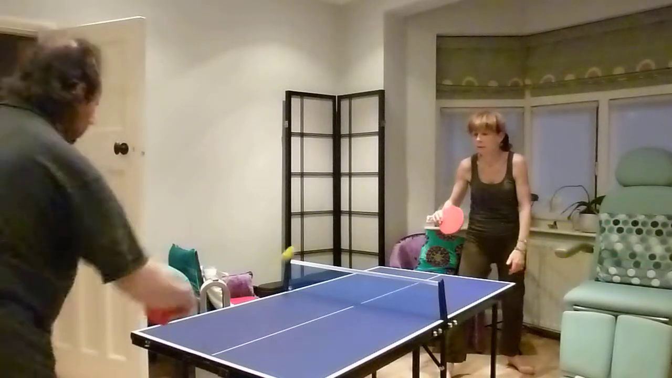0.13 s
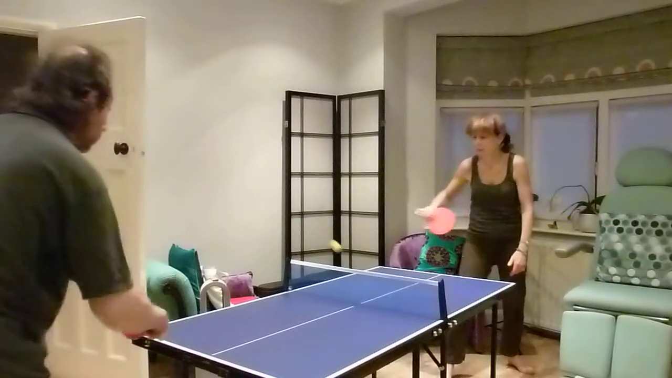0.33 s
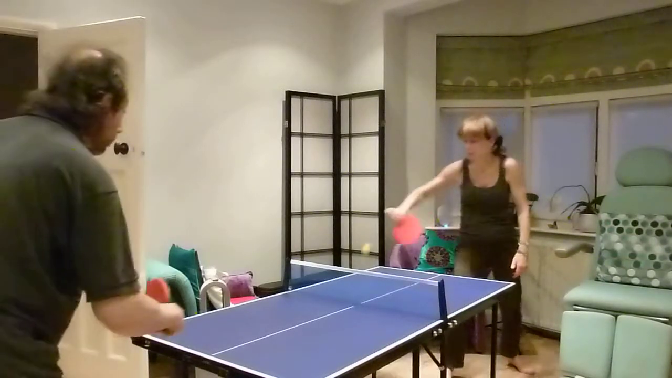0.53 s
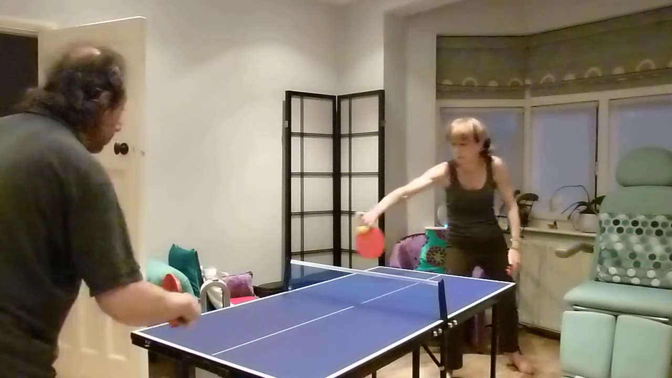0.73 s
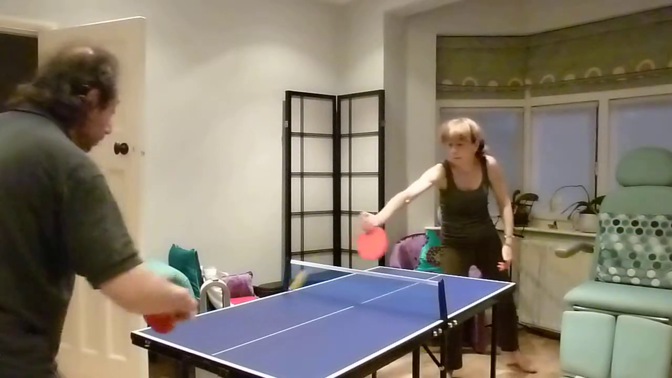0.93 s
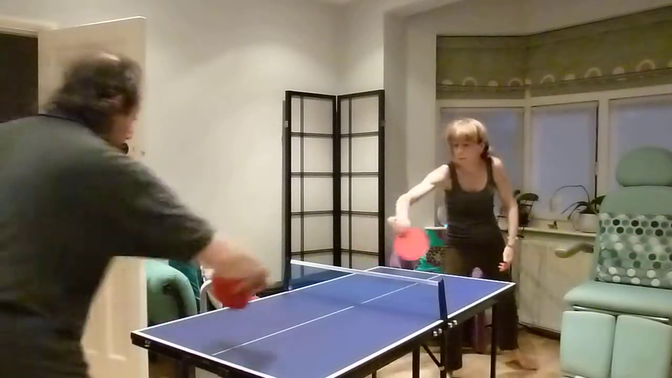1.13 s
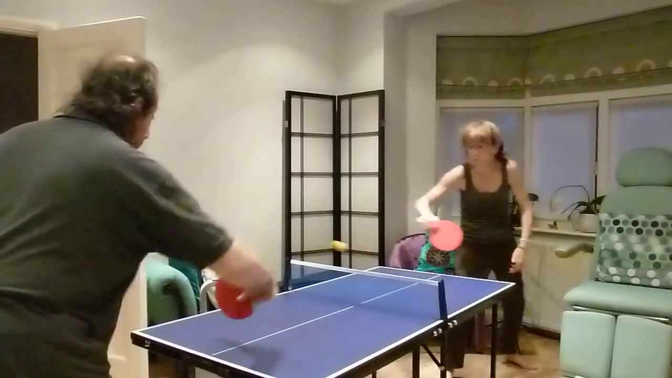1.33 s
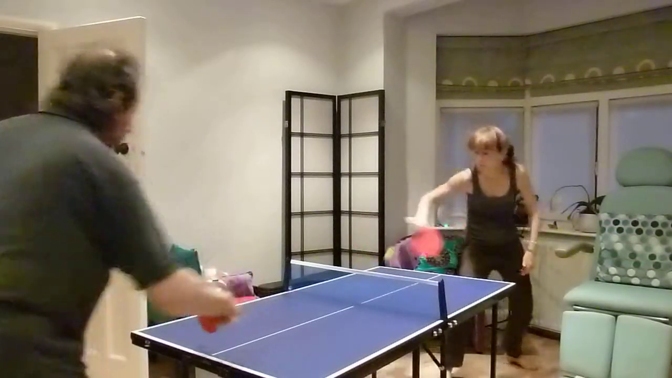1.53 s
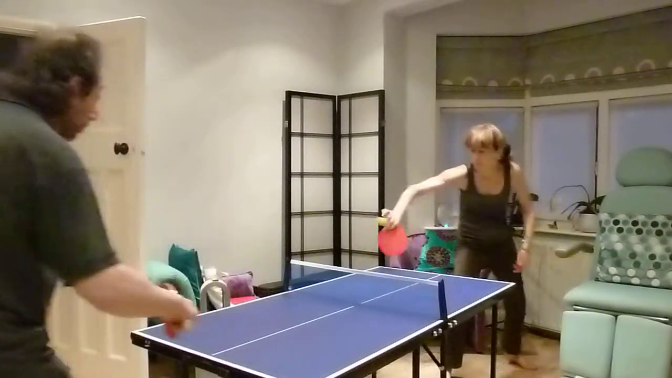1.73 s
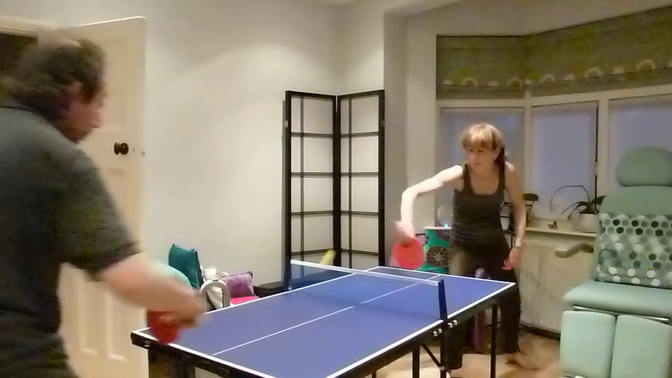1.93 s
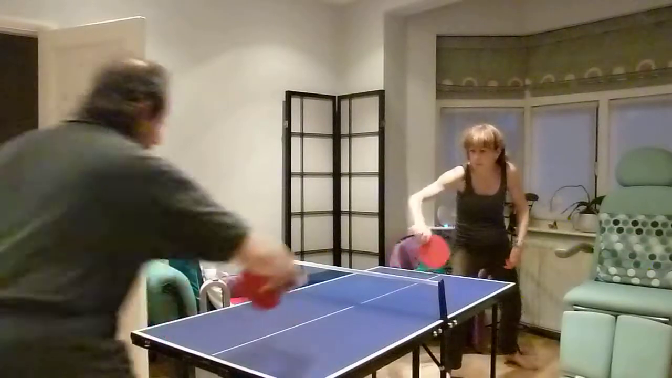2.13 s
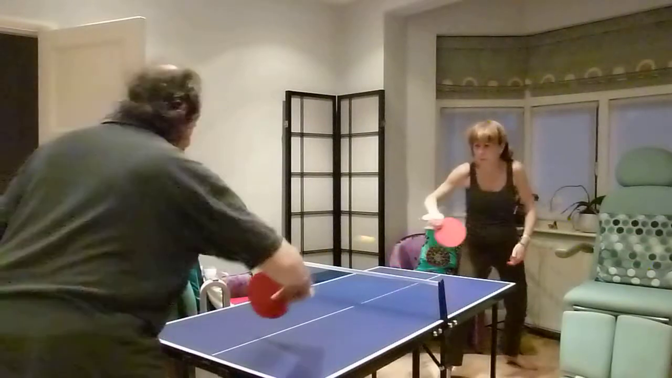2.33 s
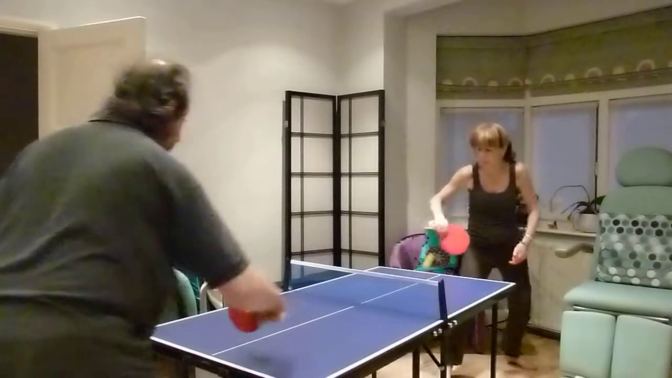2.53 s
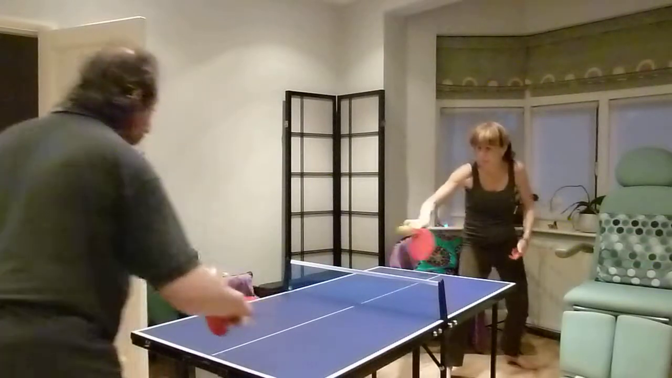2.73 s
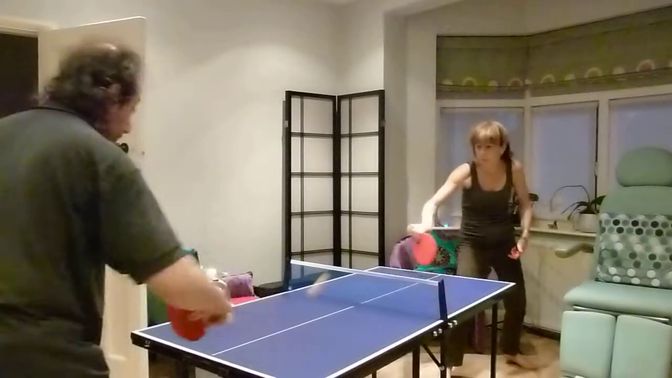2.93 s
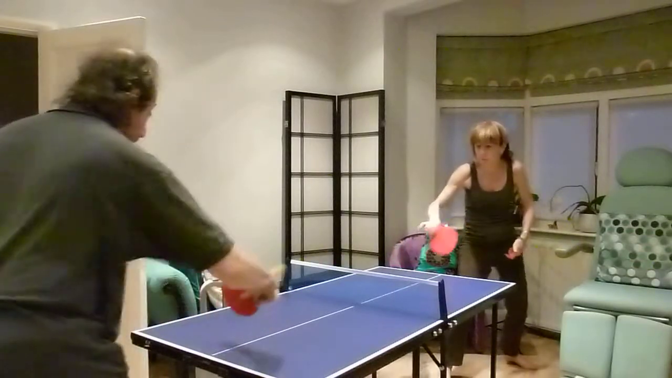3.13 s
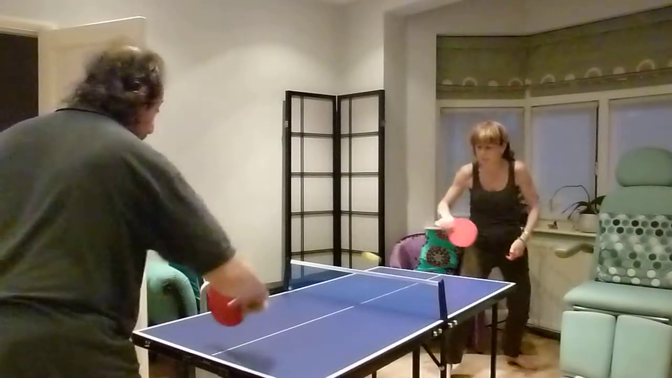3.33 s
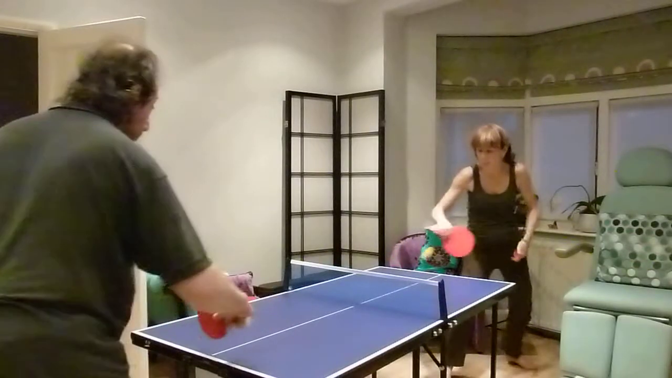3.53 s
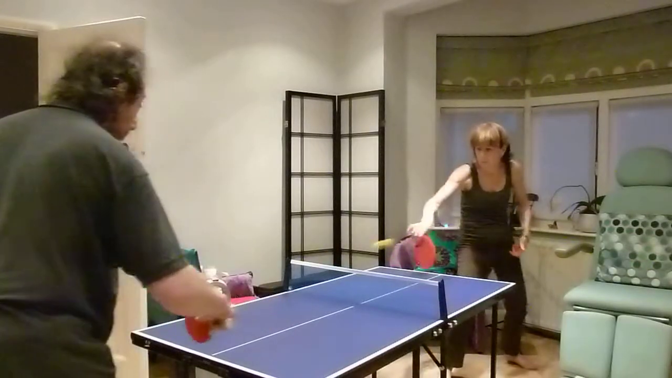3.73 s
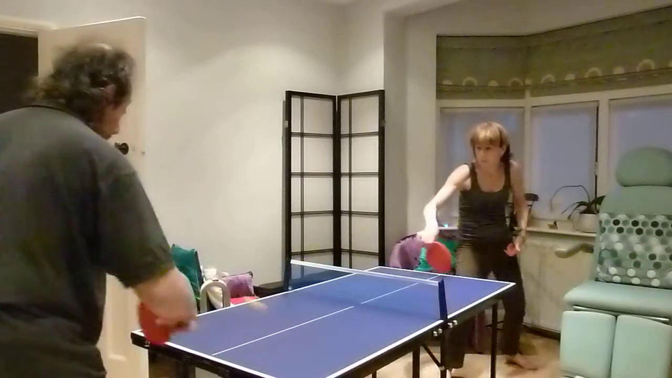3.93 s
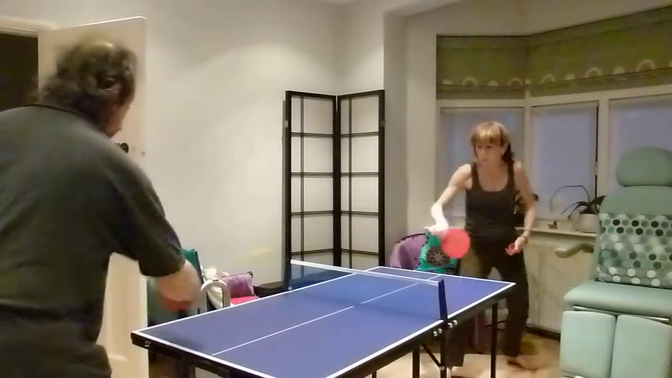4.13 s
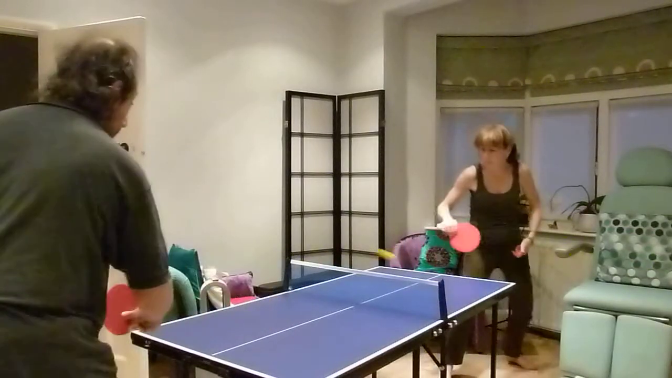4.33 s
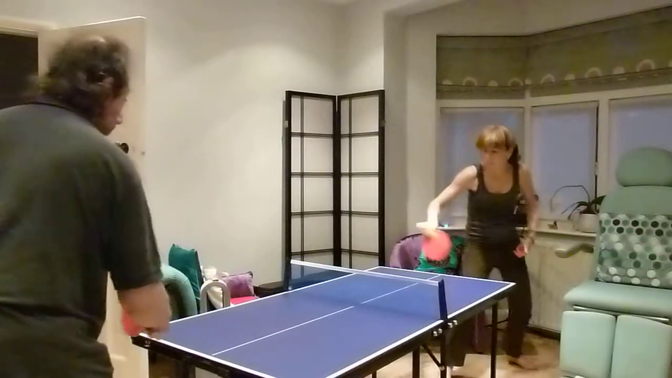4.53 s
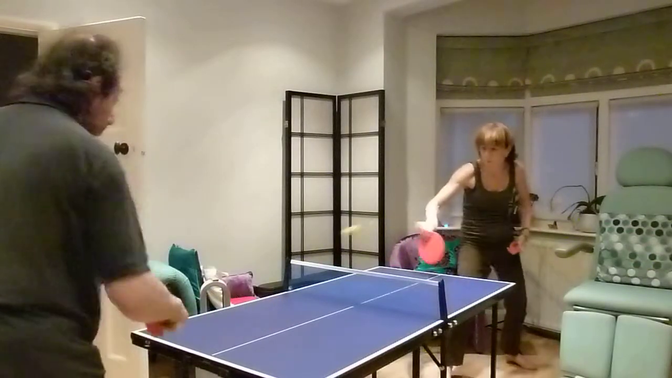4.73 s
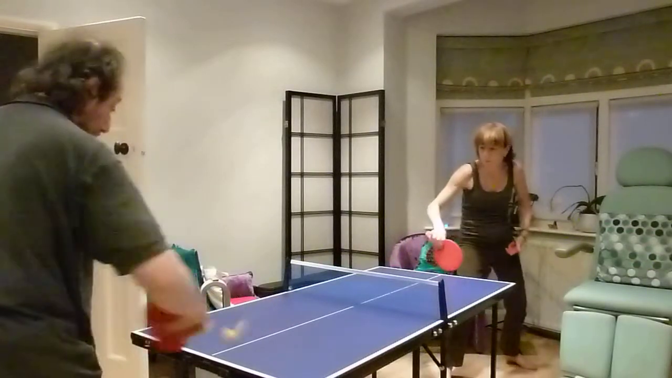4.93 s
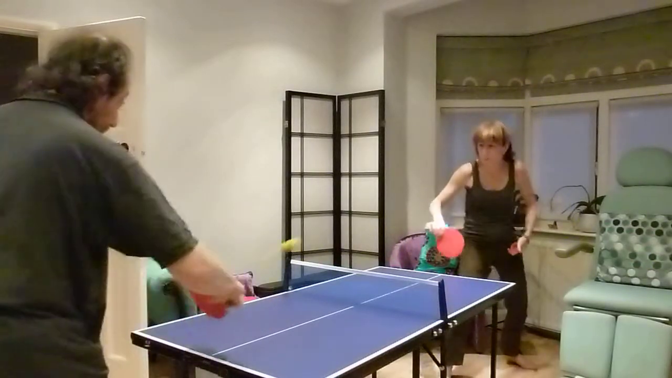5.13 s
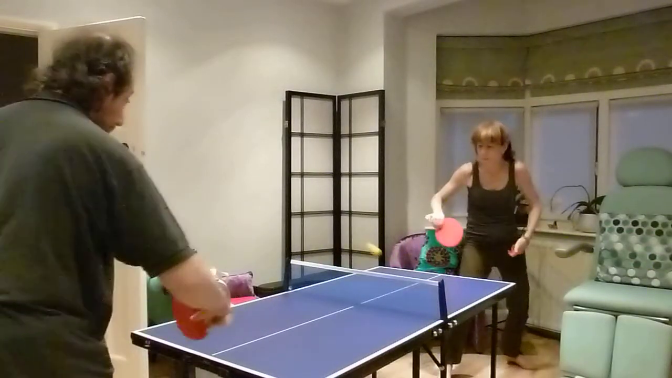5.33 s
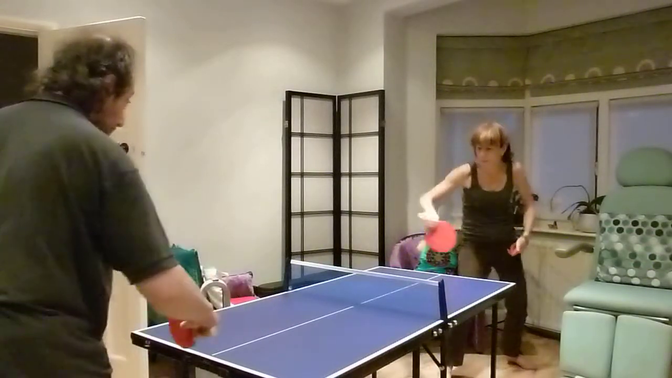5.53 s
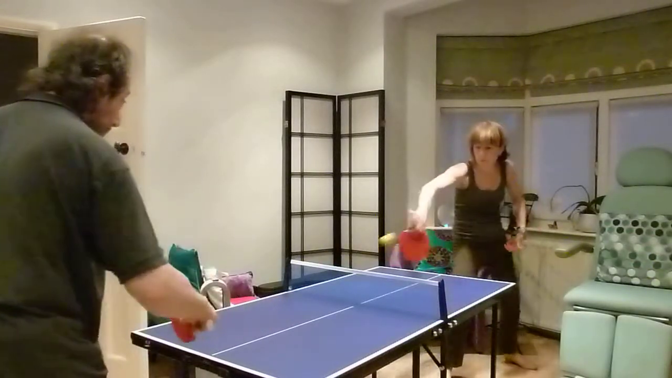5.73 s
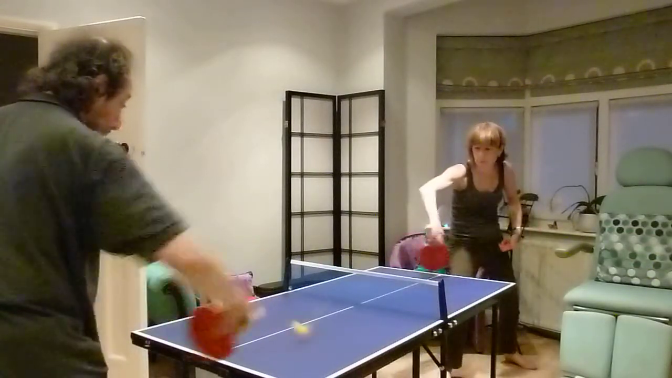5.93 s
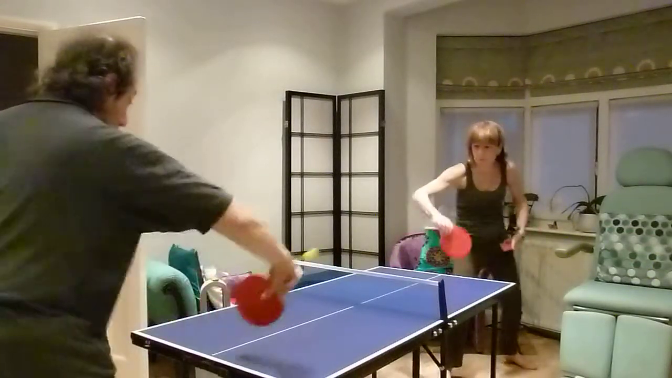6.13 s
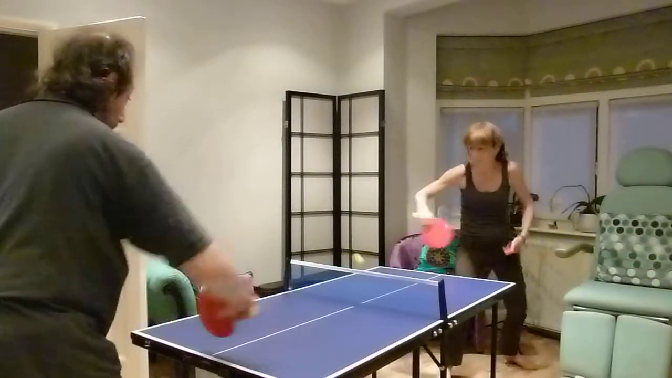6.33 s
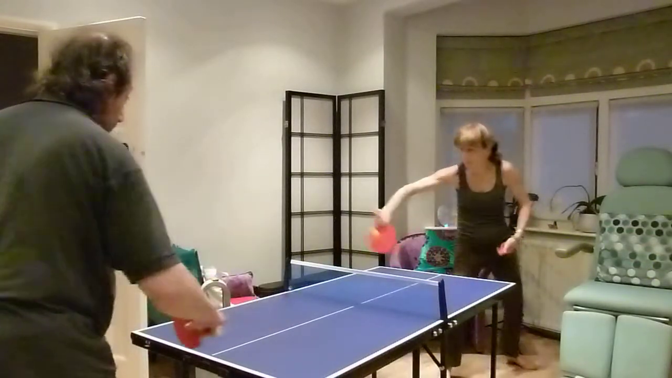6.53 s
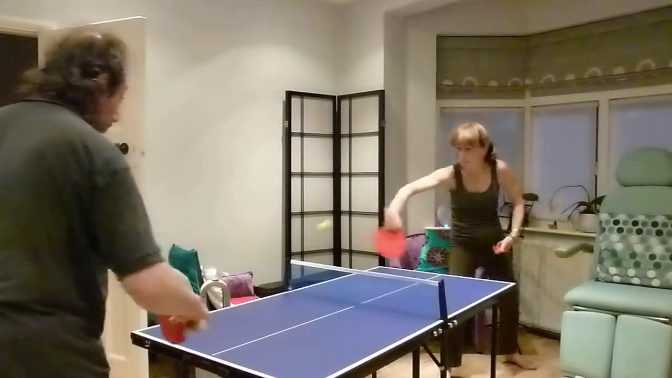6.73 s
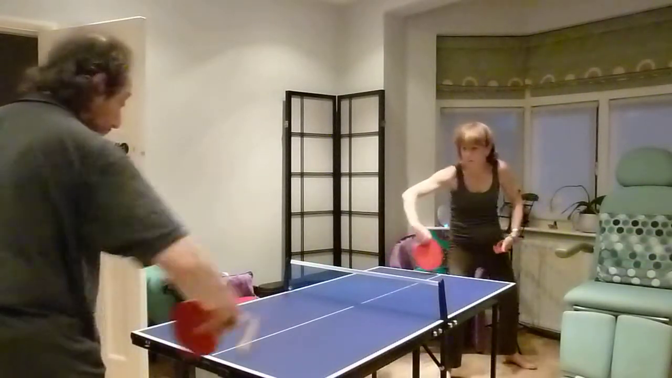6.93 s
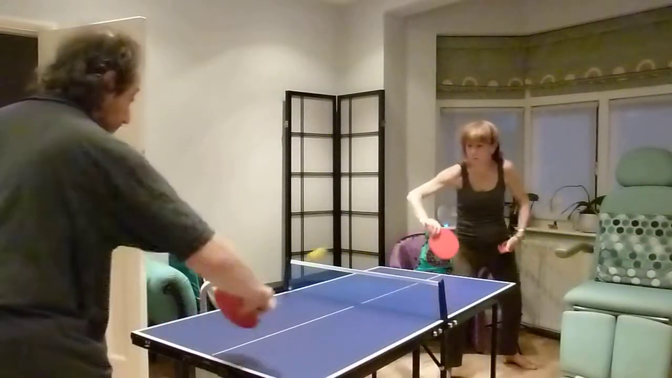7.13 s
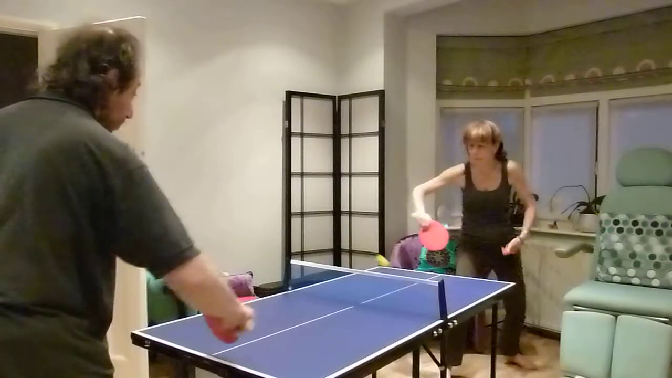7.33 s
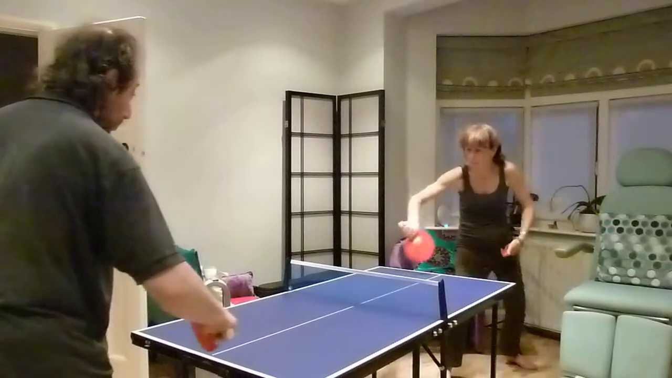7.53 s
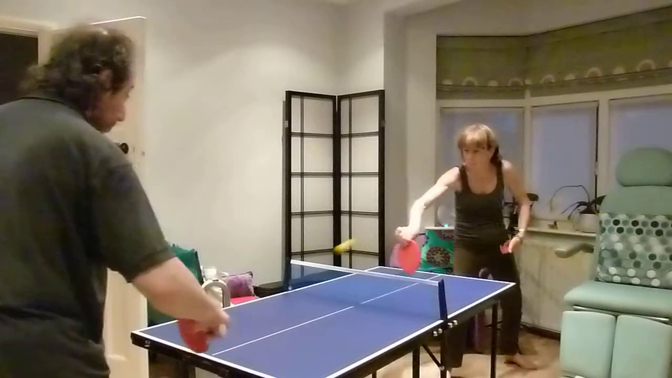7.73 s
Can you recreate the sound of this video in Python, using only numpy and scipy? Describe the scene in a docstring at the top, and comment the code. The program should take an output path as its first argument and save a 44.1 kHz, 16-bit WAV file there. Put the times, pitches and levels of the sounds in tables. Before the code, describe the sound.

A steady indoor table tennis rally: hollow, booming ball knocks on the table alternate with woody bat pocks, over soft room noise and hiss.

```python
"""In a living room, two players keep up a table tennis rally before a pair of microphones.
The ball knocks on the hollow-sounding table top, near and far end in turn: a short push sets resonances
booming and the ball's shell clicking, with a dry crack on top. Each knock is answered by the pock of
a bat, whose blade rings in two modes. Echoes and a diffuse tail ring on for about half a second.
Footfalls and short swishes are shaped noise and soft blows, over steady room noise and a wide hiss."""
import sys
import numpy as np
from scipy import signal
from scipy.fft import rfft, irfft, next_fast_len
from scipy.io import wavfile
from scipy.ndimage import uniform_filter1d

SR = 44100
rng = np.random.default_rng(int(sys.argv[2]) if len(sys.argv) > 2 else 0)


def waveform_to_disk(signal):
    """Save audio, clipped to [-1, 1], as 16-bit WAV at the path in sys.argv[1]."""
    frames = np.transpose(np.atleast_2d(signal))
    scaled = np.clip(frames, -1, 1) * 32767
    samples = np.round(scaled).astype(np.int16)
    wavfile.write(sys.argv[1], SR, samples)


N = 347111  # length of the scene [samples]
SIZE = 24576  # length of one blow's response [samples]
AGE = np.arange(SIZE) / SR  # time since the blow [s]
HZ = np.maximum(np.fft.rfftfreq(SIZE, 1 / SR), 1)

# ball on table, near and far end in turn:
# (time [s], level before the trim of its end [dB], contact time [ms], boom of the landing spot [dB])
BOUNCES = [(0.042, -15, .6, 3), (0.4763, -17.5, 0.67, -1), (1.016, -15.5, 0.59, 3), (1.506, -16, 0.63, -2),
           (2.053, -16.5, 0.64, 6), (2.5356, -17, 0.63, -0.5), (3.0197, -16, 0.61, 4),
           (3.4753, -17.5, 0.59, -2), (3.9439, -17, 0.58, 2.5), (4.4372, -16, 0.54, -3),
           (4.9687, -17.5, 0.663, -1), (5.4719, -17, 0.61, 1.5), (5.9611, -15.5, .59, 0),
           (6.4271, -18, .66, -3.5), (6.9811, -17.5, 0.64, -6), (7.4379, -18.5, 0.67, -2.5)]
# an ordinary landing at each end, before spot and contact: (knock [dB], click [dB], crack [dB])
NEAR_LANDING = (1.0, .5, -34.5)
FAR_LANDING = (.2, 3.6, -33.5)
USUAL_CONTACT_MS = .62


def from_db(db):
    """Decibels to gain."""
    return 10 ** (np.asarray(db) / 20)


def at_hz(points, hz=HZ):
    """Read a table on a log-frequency axis."""
    knots, values = np.transpose(points)
    return np.interp(np.log(hz), np.log(knots), values)


def add(out, sound, s):
    """Mix a stereo sound in at a given time."""
    start = max(round(s * SR), 0)
    out[:, start:start + sound.shape[1]] += sound[:, :N - start]


def hump(centre_hz, octaves):
    """A bell from 0 to 1 on the log-frequency axis."""
    return np.exp(-.5 * (np.log2(HZ / centre_hz) / octaves) ** 2)


def body(colour, resonances=(), vary_db=3.0):
    """Gain of a struck thing: a colour of unit energy, raised by resonances that vary with each blow."""
    power = np.ones(len(HZ))
    for hz, width, db in resonances:
        height = from_db(db + vary_db * rng.standard_normal()) ** 2
        power += height / (1 + (2 * (HZ - hz) / width) ** 2)
    gain = from_db(at_hz(colour))
    return gain * np.sqrt(power / np.mean(gain ** 2))


def causal(gain):
    """The minimum-phase response with this gain: it starts at once and rings afterwards."""
    cepstrum = irfft(np.log(gain + 1e-9))
    cepstrum[1:SIZE // 2] *= 2
    cepstrum[SIZE // 2 + 1:] = 0
    return np.exp(rfft(cepstrum))


def spread(mid, side, hz):
    """Two unrelated spectra become left and right, nearly alike in the bass."""
    # diffuse sound at the microphone pair: (frequency [Hz], likeness of left and right [0 to 1])
    likeness = [(60, .999), (240, .9997), (380, .998), (600, .99), (850, .93), (1050, .58), (1400, .96),
                (2000, .82), (2700, .62), (4500, .48), (7500, .68)]
    alike = np.clip(at_hz(likeness, hz), 0, 1)
    shared = np.sqrt((1 + alike) / 2) * mid
    opposed = np.sqrt((1 - alike) / 2) * side
    return shared + opposed * [[1], [-1]]


def room(direct_db, early_db, early_s, early_tilt_db=1.0, beam_hz=700):
    """Stereo response: direct sound, a flurry of echoes from nearby surfaces, and a diffuse tail."""
    # room decay: (frequency [Hz], time to fall by 60 dB [s])
    room_t60 = [(90, 0.74), (260, 0.46), (700, 0.42), (1800, 0.43), (5000, 0.37)]
    centres = np.array(room_t60)[:, 0]
    # the echoes build up over the first millisecond or so
    noise = rng.standard_normal((2, SIZE)) * (1 - np.exp(-AGE / 0.00072))
    flurry = from_db(early_db) * np.exp(-AGE / early_s) * np.sqrt(2 / (early_s * SR))
    echoes = 0
    for own, (hz, t60) in zip(np.eye(len(room_t60)), room_t60):
        fade = np.log(1000) / t60
        tail = np.exp(-fade * AGE) * np.sqrt(2 * fade / SR)
        share = np.interp(np.log(HZ), np.log(centres), own)
        tilt = from_db(early_tilt_db * np.log2(hz / beam_hz))  # dB per octave
        echoes = echoes + share * rfft(noise * np.hypot(tail, flurry * tilt))
    # a flat panel sends little bass along its own plane
    direct = from_db(direct_db) * 1j * HZ / (beam_hz + 1j * HZ)
    return direct + spread(*echoes, HZ)


def blow(gain, path, level_db):
    """A blow reaches two microphones; level is a unit-energy blow's rms over a twentieth of a second."""
    # microphone pair: (frequency [Hz], phase by which left leads right [rad])
    lead = [(100, 0), (250, -.02), (500, -.07), (920, .08), (1130, -1.2), (2000, -.55), (3000, -.75),
            (4000, -.2), (6000, 0)]
    # microphone pair: (frequency [Hz], left minus right [dB])
    balance = [(250, 0), (750, 1.8), (1250, -.5), (2300, .7), (6000, .3)]
    ports = np.array([[.5], [-.5]])
    pair = from_db(ports * at_hz(balance)) * np.exp(1j * ports * at_hz(lead))
    # the path smears the blow in time but keeps its broad colour
    passed = np.sqrt(uniform_filter1d(np.mean(np.abs(path) ** 2, axis=0), size=35))
    heard = irfft(causal(gain / passed) * path * pair)[:, :SIZE * 7 // 8]
    return from_db(level_db) * np.sqrt(SR / 20) * heard


def steady_noise(colour):
    """Stereo noise of a given colour, rms 1."""
    size = next_fast_len(N)
    hz = np.maximum(np.fft.rfftfreq(size, 1 / SR), 1)
    mid, side = rfft(rng.standard_normal((2, size)))
    noise = irfft(spread(mid, side, hz) * from_db(at_hz(colour, hz)), size)[:, :N]
    return noise / noise.std()


def quiet_room(level_db=-56):
    """The steady background of the room: coloured noise, nearly alike in both channels in the bass."""
    # colour of the background: (frequency [Hz], relative density [dB per Hz])
    quiet = [(25, -16.5), (62, -4.5), (150, 1.5), (300, 2), (600, -4), (1200, -9.5), (2500, -15),
             (5500, -15.5), (7300, -21.5), (8000, -49.5)]
    return from_db(level_db) * steady_noise(quiet)


def hiss(level_db=-52):
    """The microphones' own noise, opposite in the two channels and so heard wide."""
    # colour of the hiss: (frequency [Hz], relative density [dB per Hz])
    hiss_colour = [(25, -23.5), (70, -5), (150, -5), (300, 0), (1000, -1), (2000, -5.5), (4000, -10.5),
                   (5500, -16), (7000, -24), (8000, -51)]
    return from_db(level_db) * steady_noise(hiss_colour)[0] * [[1], [-1]]


def table(notch_fill=.24, notch_from_hz=1700, floor_db=-5.5, floor_s=0.007595, near_db=-2.0, far_db=-2.5):
    """The ball's short push sets the table top booming and its own shell clicking."""
    # colour of a knock on the table top: (frequency [Hz], relative level [dB])
    top_colour = [(30, -21.5), (55, 4.5), (85, 3.5), (130, 11), (175, 10), (240, 19.5), (450, 21),
                  (800, 19), (1050, 14), (1650, 14), (2500, 9), (3400, 4.5), (5000, -2.5), (7500, -13)]
    # resonances of each end, varying by blow: (frequency [Hz], width [Hz], usual height over the colour [dB])
    near_end = [(87, 5.8, 12.5), (142.5, 8.4, 7), (270.7, 11, 8), (864, 41, -2.5)]
    far_end = [(131.2, 4.3, 11), (221.8, 23, 11), (272, 8.4, 10), (441.4, 21.3, 8.4), (616.6, 15, 6)]
    knock_db_per_ms = 38  # a longer, softer contact gives more knock
    panel_hz, panel_scatter_hz = 449, 30.2
    out = np.zeros((2, N))
    for k, (s, level_db, contact_ms, boom_db) in enumerate(BOUNCES):
        far = k % 2
        knock_db, click_db, _ = FAR_LANDING if far else NEAR_LANDING
        knock_db = knock_db + knock_db_per_ms * (contact_ms - USUAL_CONTACT_MS)
        # each spot favours another panel resonance
        panel = (rng.normal(panel_hz, panel_scatter_hz), 45, 1.0)
        gain = body(top_colour, (far_end if far else near_end) + [panel])
        # the landing spot and the contact decide how much of each register sounds
        spot_db = boom_db * hump(180, 0.43) + knock_db * hump(350, 0.93) + click_db * hump(5700, 0.32)
        # a push of finite length leaves evenly spaced notches in the treble
        push = 2 * (np.cos(np.pi * HZ * contact_ms / 1000) ** 2 + notch_fill ** 2)
        dips_db = 10 * np.log10(push) / (1 + (notch_from_hz / HZ) ** 4)
        if far:
            path = room(direct_db=-15.0, early_db=-6.0, early_s=0.0079)
        else:
            path = room(direct_db=-13.0, early_db=-17.0, early_s=0.013)
        # the underside's boom comes back from the floor
        delay = np.exp(-2j * np.pi * HZ * floor_s)
        path = path + from_db(floor_db) * hump(270, 0.81) * delay
        knock = blow(gain * from_db(spot_db + dips_db), path, level_db + (far_db if far else near_db))
        add(out, knock, s)
    return out


def cracks(fade_s=0.0065, width=0.8):
    """Landings add a dry, fast-fading crack of noise, stronger with short contact and on booming spots."""
    # colour of the crack: (frequency [Hz], relative level [dB])
    crack_colour = [(300, -23.5), (1200, -4), (1800, -1), (2500, -14.5), (3050, 0), (3600, -4), (4100, -25),
                    (8000, -24)]
    crack_loss_db_per_ms, crack_per_boom = 69, 1.1  # the latter in dB per dB
    out, gain = np.zeros((2, N)), body(crack_colour)
    fade = np.exp(-AGE / fade_s) + 1e-9
    for k, (s, _, contact_ms, boom_db) in enumerate(BOUNCES):
        *_, usual_db = FAR_LANDING if k % 2 else NEAR_LANDING
        softness_db = crack_loss_db_per_ms * (contact_ms - USUAL_CONTACT_MS)
        crack_db = usual_db - softness_db + crack_per_boom * boom_db
        mid, side = rfft(rng.standard_normal((2, SIZE)) * fade)
        add(out, blow(gain, spread(mid, width * side, HZ), crack_db), s)
    return out


def bats(shadow_hz=2600):
    """Each wooden blade rings in two modes: grip sets their pitch, the spot hit shares the blow out."""
    # ball on bat, near and far player in turn:
    # (time [s], level [dB], blade pitch [Hz], spot [0 rings the low mode only, 1 the upper])
    strokes = [(0.094, -31.5, 870, 0.37), (0.6922, -27.5, 879, 0.11), (1.1402, -26.3, 908, 0.19),
               (1.6645, -26.5, 894, 0.38), (2.1685, -26, 930, 0.071), (2.6475, -25, 883, 0.22),
               (3.1168, -26, 923, 0.19), (3.6485, -26, 900, 0.42), (4.0795, -22.5, 911, 0.27),
               (4.5255, -24, 894, 0.43), (5.028, -26.5, 910.5, 0.29), (5.6253, -26.5, 870, 0.27),
               (6.0535, -25.5, 922, 0.41), (6.5507, -24.5, 907, 0.78), (7.03, -28, 871, .25),
               (7.581, -27, 884, 0.67)]
    # colour of each bat: (frequency [Hz], relative level [dB])
    near_bat = [(60, -22.5), (170, -14), (270, 0.5), (600, -4), (1100, 3), (1600, 6), (1900, -3),
                (2400, -3), (3200, -12.5), (4500, -13), (8000, -31.5)]
    far_bat = [(60, -26), (190, -12), (310, 3), (550, -0.5), (1100, 4), (1500, 3), (2000, 1), (2800, -4),
               (3400, -12.5), (4400, -11.5), (8000, -28.5)]
    # bending modes of each blade: (low mode's width [Hz], upper / low pitch [ratio], upper mode's width [Hz])
    near_blade = (23.7, 2.37, 87)
    far_blade = (38, 1.855, 52)
    # a firm stroke of each bat: (fullest low ring [dB], fullest upper ring [dB], click before the spot [dB])
    near_stroke = (23.8, 20, -2.3)
    far_stroke = (20.8, 16.4, 0.91)
    # below a firm stroke the blade rings less (dB per dB); spots that miss the low mode click more
    firm_stroke_db, ring_loss, spot_click_db = -26, 2.1, 4.0
    out = np.zeros((2, N))
    for k, (s, level_db, pitch_hz, spot) in enumerate(strokes):
        far = k % 2
        low_width, ratio, upper_width = far_blade if far else near_blade
        low_db, upper_db, click_db = far_stroke if far else near_stroke
        angle = np.pi / 2 * np.clip(spot, .01, .99)
        soft_db = ring_loss * min(level_db - firm_stroke_db, 0)
        low_ring_db = low_db + soft_db + 20 * np.log10(np.cos(angle))
        upper_ring_db = upper_db + soft_db + 20 * np.log10(np.sin(angle))
        modes = [(pitch_hz, low_width, low_ring_db), (pitch_hz * ratio, upper_width, upper_ring_db)]
        click = from_db((click_db + spot_click_db * spot) * hump(5400, 0.64))
        gain = body(far_bat if far else near_bat, modes, vary_db=1.0) * click
        # each end has its own mix of direct sound and early echoes
        if far:
            path = room(direct_db=-6.5, early_db=-3.0, early_s=0.012)
        else:
            # the near player shades the direct treble
            shade_db = -10 * np.log10(1 + (HZ / shadow_hz) ** 4)
            path = room(direct_db=-9.0 + shade_db, early_db=-3.0, early_s=0.012, early_tilt_db=-2.5)
        add(out, blow(gain, path, level_db), s)
    return out


def players():
    """Dull footfalls on the wooden floor, and short swishes as the players reach for the ball."""
    # shoes and clothes rubbing: (time [s], level [dB], rise [s], fade [s])
    scuffs = [(.27, -50, .03, 0.065), (1.334, -43, 0.012, 0.046), (1.44, -56, 0.034, 0.11),
              (2.249, -46.5, 0.098, 0.087)]
    # soft footfalls: (time [s], level [dB])
    steps = [(0.899, -48.5), (1.369, -44.5), (1.469, -42), (2.0, -49), (2.33, -42.5)]
    # colour of a footfall: (frequency [Hz], relative level [dB])
    foot = [(30, -10), (80, -7.5), (200, 1.5), (450, -3), (1000, -18), (6000, -26.5)]
    # colour of rubbing: (frequency [Hz], relative density [dB per Hz])
    cloth = [(200, -6), (1000, -5.5), (2500, 0), (5000, 1.5), (8000, -10.5), (11000, -30)]
    out, t = np.zeros((2, N)), np.arange(N) / SR
    for s, level_db in steps:
        path = room(direct_db=-19.5, early_db=-13.0, early_s=0.024)
        add(out, blow(body(foot), path, level_db), s)
    rubbing = np.zeros(N)
    for s, level_db, rise, fade in scuffs:
        # swells up to its time, then dies away
        rubbing += from_db(level_db) * np.exp(-np.maximum((s - t) / rise, (t - s) / fade))
    return out + rubbing * steady_noise(cloth)


def scene():
    """The rally over the quiet of the room and the hiss of the microphones."""
    return quiet_room() + hiss() + table() + cracks() + bats() + players()


def record(dry):
    """The camera drops the deep bass, rounds the highest peaks and cuts the treble off steeply."""
    lean = signal.sosfilt(signal.butter(2, 42, "high", fs=SR, output="sos"), dry)
    rounded = lean / (1 + (lean / .68) ** 4) ** (1 / 4)
    return signal.sosfilt(signal.cheby1(10, .3, 7650, fs=SR, output="sos"), rounded)


dry = scene()
out = record(dry)
waveform_to_disk(out)
```